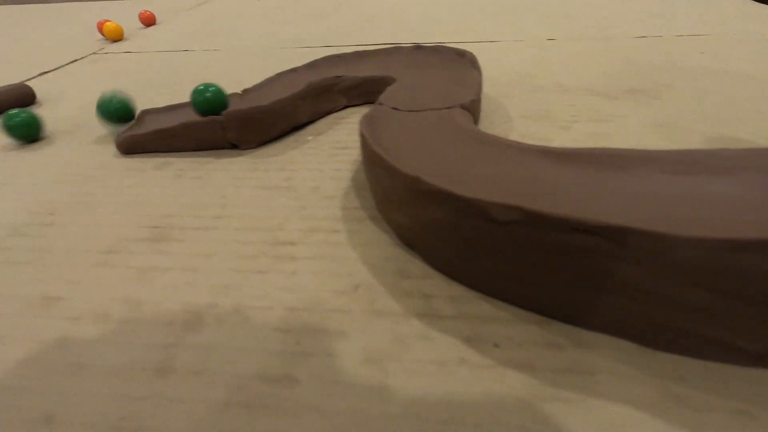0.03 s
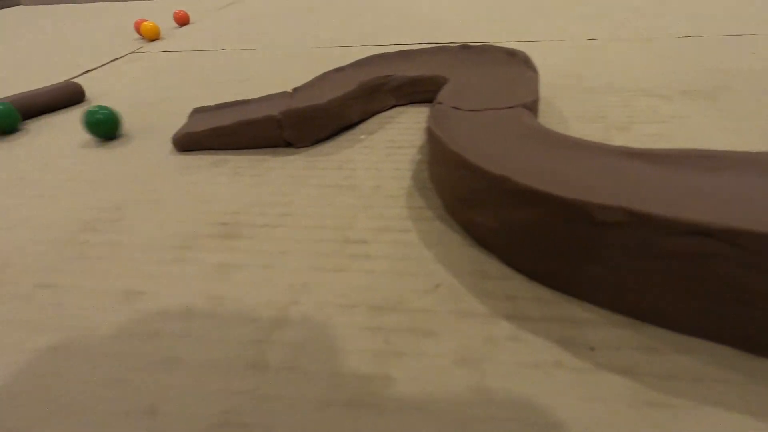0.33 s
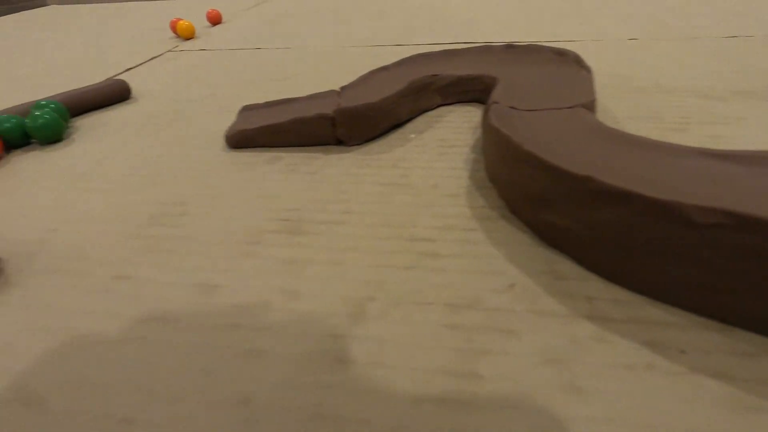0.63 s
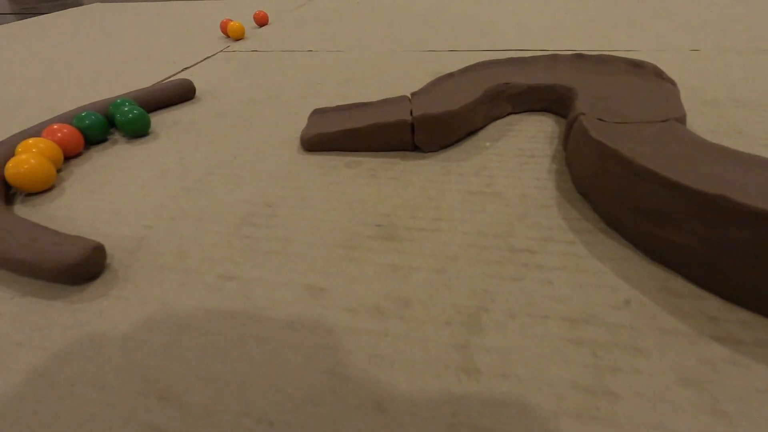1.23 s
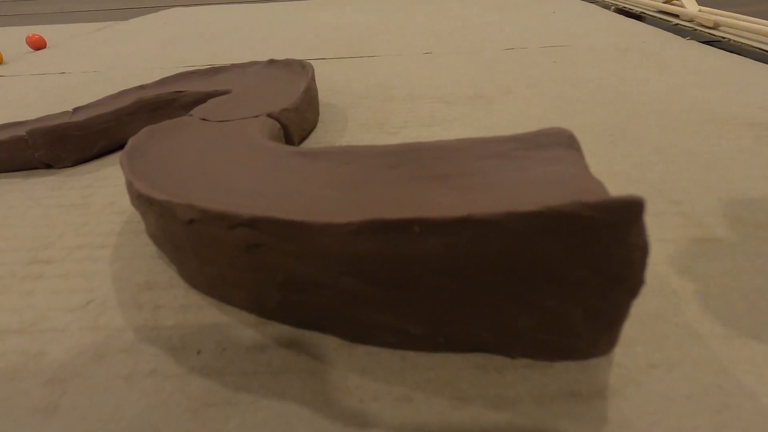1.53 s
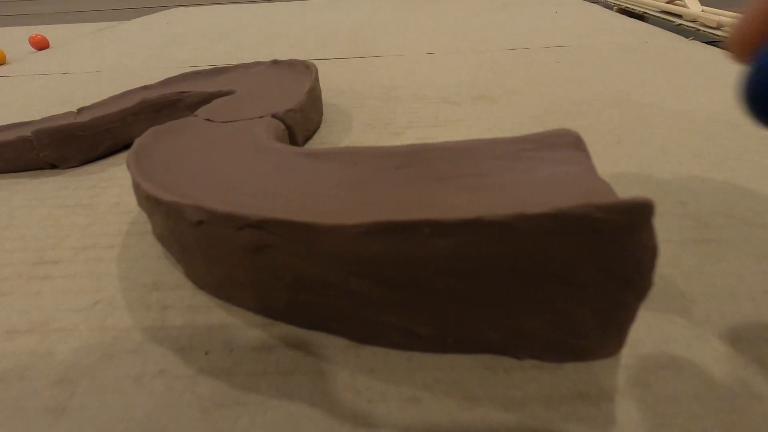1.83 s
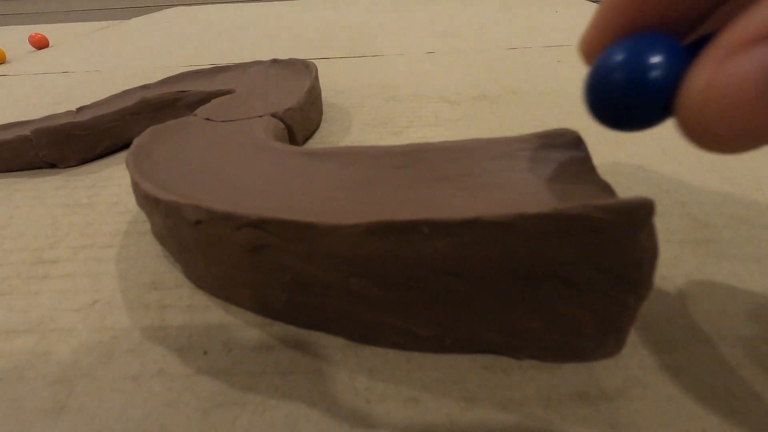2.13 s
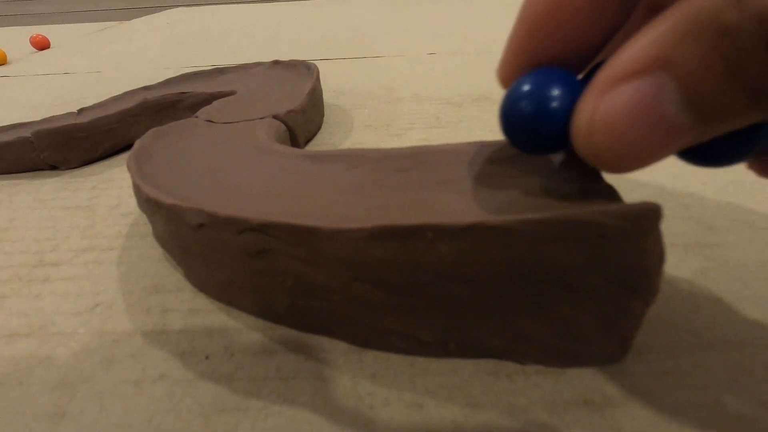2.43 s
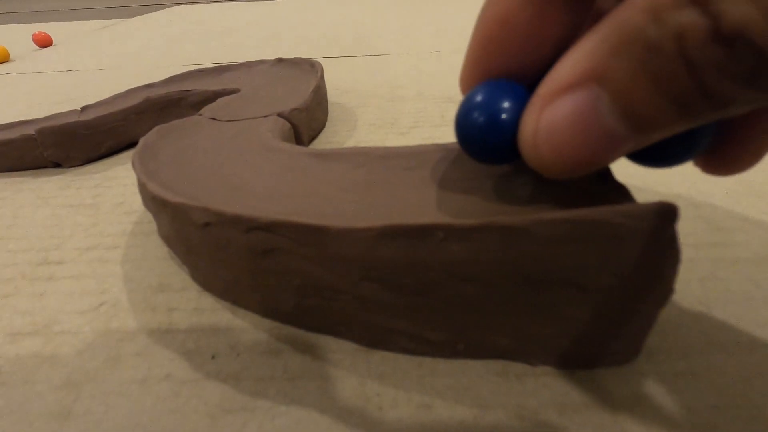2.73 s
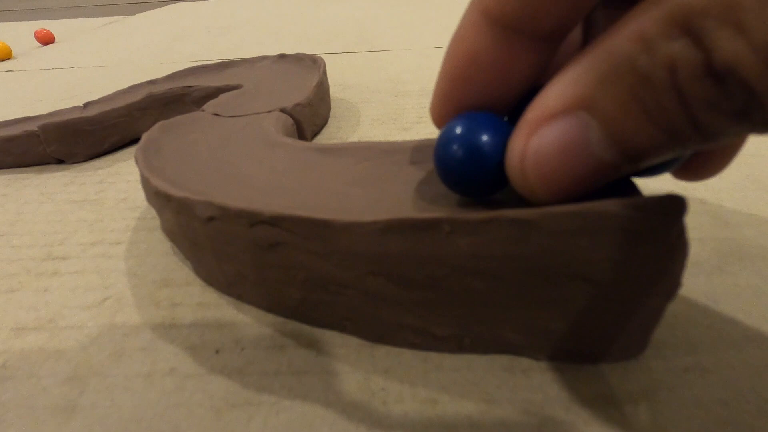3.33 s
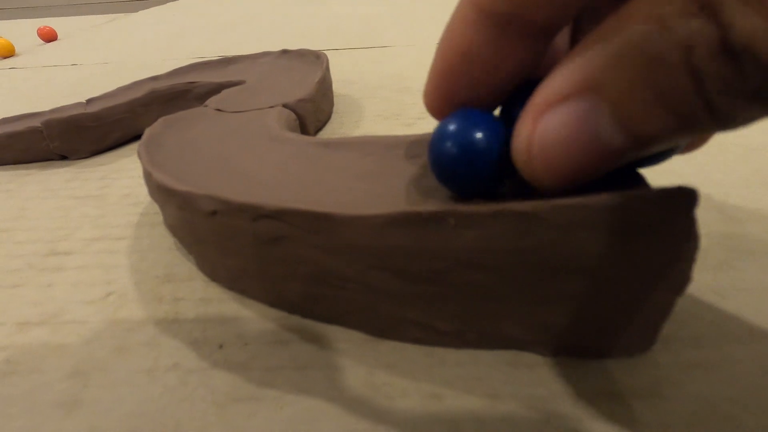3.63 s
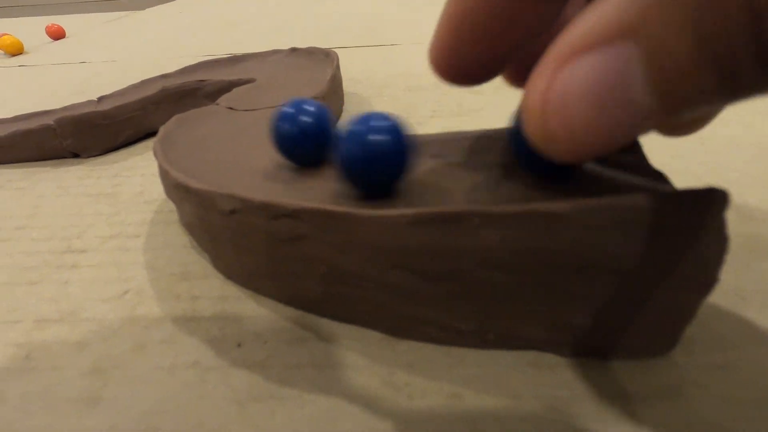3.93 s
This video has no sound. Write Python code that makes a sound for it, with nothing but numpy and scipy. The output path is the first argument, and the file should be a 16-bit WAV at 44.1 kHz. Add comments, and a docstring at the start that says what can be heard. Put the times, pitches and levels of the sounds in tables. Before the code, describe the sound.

Glass marbles knock onto a wooden board, roll with a rumble and click together.

```python
"""Hard knocks on wood, then a rumble: glass marbles drop off a clay track onto a board, roll across it
and click into the marbles waiting there. Each landing bends the board and rings its modes; tiny bumps
under the rolling glass keep it shaking, until the sound cuts off with a dry tick. Then a hand brings
new marbles, which click between the fingers as they are set on the track.
The hand-held camera bumps softly as it moves. The room is small and quiet."""
import sys
import numpy as np
from scipy import signal
from scipy.fft import rfft, irfft, next_fast_len
from scipy.io import wavfile
from scipy.ndimage import uniform_filter1d, map_coordinates

SR = 44100
rng = np.random.default_rng(int(sys.argv[2]) if len(sys.argv) > 2 else 0)


def dump(signal):
    """Clip the signal to [-1, 1] and save it as 16-bit WAV at the path in sys.argv[1]."""
    limited = np.clip(np.atleast_2d(signal).T, -1, 1)
    pcm = np.round(limited * 32767).astype(np.int16)
    wavfile.write(sys.argv[1], SR, pcm)


N = 176400

# How alike left and right are, from centred bass to wide treble: f/Hz, coherence
STEREO_COHERENCE = [(50, 1), (250, 0.76), (600, 0.71), (1500, 0.085), (4000, 0.18), (10000, 0.036)]
BEND_DELAY_S, BEND_HZ = 0.00131, 425.6  # a bending wave's travel time at this frequency


def amp(db):
    """Decibels to gain."""
    return 10 ** (np.asarray(db) / 20)


def unit(x):
    """Scale to rms 1."""
    return x / np.sqrt(np.mean(x ** 2) + 1e-20)


def along(points, hz):
    """Read (f/Hz, value) points on a log frequency axis."""
    freqs, values = np.transpose(points)
    return np.interp(np.log(hz + 1), np.log(freqs + 1), values)


def clock():
    """Time of each sample in seconds."""
    return np.arange(N) / SR


def curves(rows):
    """One automation curve for each column after the time."""
    times, *columns = np.transpose(rows)
    return [np.interp(clock(), times, column) for column in columns]


def during(rows):
    """Gate that shuts fast outside the time span of a table."""
    outside = np.maximum(rows[0][0] - clock(), clock() - rows[-1][0])
    return amp(-3000 * np.maximum(outside, 0))


def swell(peak_s, rise, fall):
    """Bell-shaped envelope."""
    t = clock() - peak_s
    return np.exp(-.5 * (t / np.where(t < 0, rise, fall)) ** 2)


def wobble(per_s):
    """A smooth random curve with per_s knots a second."""
    return map_coordinates(rng.standard_normal(2000), [clock() * per_s], mode="mirror")


def pan(db):
    """Stereo gains, the left db above the right."""
    gains = np.array([amp(np.atleast_1d(db) / 2), amp(-np.atleast_1d(db) / 2)])
    return gains / gains.mean(axis=0)


def filtered(x, response):
    """Equalise x with a gain given as a function of frequency."""
    size = next_fast_len(N + SR // 2)
    return irfft(rfft(x, size) * response(np.fft.rfftfreq(size, 1 / SR)), size)[..., :N]


def mid_side(hz):
    """Mid and side gains that set the stereo width at each frequency."""
    angle = np.arccos(np.clip(along(STEREO_COHERENCE, hz), 0, 1)) / 2
    return np.array([np.cos(angle), np.sin(angle)])


def spread(pair, tone):
    """Colour two unrelated signals and mix them to stereo of rms 1."""
    mid, side = filtered(pair, lambda hz: amp(along(tone, hz)) * mid_side(hz))
    return unit(np.array([mid + side, mid - side]))


def noise(tone):
    """Coloured stereo noise."""
    return spread(rng.standard_normal((2, N)), tone)


def grains(per_s):
    """Two random trains of tiny impulses."""
    return rng.standard_normal((2, N)) * (rng.random((2, N)) < per_s / SR)


def pulse(tone, stretch=1, size=4096):
    """Minimum-phase transient of peak 1 with the given spectrum, transposed by the ratio stretch."""
    hz = np.fft.rfftfreq(size, 1 / SR)
    cepstrum = irfft(np.log(amp(along(tone, hz / stretch))))
    cepstrum[1:size // 2] *= 2
    cepstrum[size // 2 + 1:] = 0
    hit = irfft(np.exp(rfft(cepstrum)))
    return hit / np.abs(hit).max()


def ringing(modes):
    """Sum of decaying sines from rows of f/Hz, level/dB, t60/s."""
    t = np.arange(SR // 3) / SR
    return sum(amp(db - 60 * t / t60) * np.sin(2 * np.pi * hz * t) for hz, db, t60 in modes)


def add(out, s, x):
    """Mix x into out at time s."""
    start = round(s * SR)
    out[:, start:start + x.shape[-1]] += x[..., :N - start]


def in_room(x, wet_db):
    """The small room adds a short diffuse tail whose treble dies first."""
    # Reverb decay: f/Hz, t60/s
    decay = [(200, 0.57), (2000, 0.55), (7000, 0.22), (14000, .2)]
    hz, t, spectra = signal.stft(rng.standard_normal((2, SR // 2)), SR, nperseg=256)
    spectra = spectra * mid_side(hz[:, None]) * amp(-60 * t / along(decay, hz)[:, None])
    mid, side = signal.istft(spectra, SR, nperseg=256)[1]
    tail = np.array([mid + side, mid - side]) / np.linalg.norm(mid + side)
    send = (x + x.mean(axis=0)) / 2
    return x + amp(wet_db) * signal.fftconvolve(send, tail, axes=1)[:, :N]


def room_tone(above_bass_db=-82.5):
    """A steady bed of room noise, its level set by the part above 300 Hz."""
    # Bass-heavy air: f/Hz, relative level/dB
    air_tone = [(15, -36), (30, -4.5), (66, 1.5), (110, -19), (183, -11.5), (433, -37), (848, -38.5),
                (1020, -32), (2010, -34.5), (4040, -42.5), (7300, -40), (8810, -52), (15500, -56)]
    air = noise(air_tone)
    return amp(above_bass_db) * air / filtered(air, lambda hz: hz > 300).std()


def splice_click(at_s=1.3347, peak_db=-46.5):
    """The sound cuts off abruptly with one dull, dry splice click."""
    # Dull click: f/Hz, relative level/dB
    click_tone = [(60, -3), (280, 0), (700, -12), (2000, -24), (7000, -33), (15000, -44)]
    out = np.zeros((2, N))
    add(out, at_s, -amp(peak_db) * pulse(click_tone))
    return out


def camera_bumps(gain_db=6.5):
    """Each nudge of the hand rocks the camera at its low resonance."""
    # Nudges: peak t/s, width/s, relative level/dB
    bumps = [(.005, 0.033, -44), (0.777, 0.061, -47.5), (0.918, 0.029, -47), (1.017, 0.018, -49.5),
             (1.082, 0.02, -48), (1.173, 0.016, -48.5), (1.37, 0.065, -66), (1.551, 0.042, -64.5),
             (2.111, 0.084, -60.5), (2.73, 0.037, -55.5), (2.898, 0.08, -53.5), (3.066, 0.038, -55.5),
             (3.362, 0.011, -51), (3.479, 0.092, -58), (3.797, 0.038, -57.5), (3.973, 0.046, -60.5)]
    # The camera's boom: f/Hz, relative level/dB
    bump_tone = [(25, -31), (42, -6), (51, 4.5), (60, -10.5), (75, -20), (150, -46), (800, -120)]
    nudges = np.sqrt(sum((amp(db) * swell(s, width, width)) ** 2 for s, width, db in bumps))
    boom = noise(bump_tone)
    running_rms = np.sqrt(np.abs(uniform_filter1d(boom[0] ** 2, size=2600)) + 1e-6)
    pan_db = np.interp(clock(), (2.7, 3.2), (.3, 4))
    return amp(gain_db) * nudges * boom / running_rms * pan(pan_db)


def clay_scrapes(q=5.2):
    """Fingers and marbles scrape the clay: bursts of tiny slips through one broad resonance."""
    # Scrapes: peak t/s, width/s, level/dB, resonance f/Hz
    strokes = [(1.96, 0.017, -75.5, 1600), (2.735, .012, -75.5, 1620), (2.783, 0.015, -75.5, 5200),
               (2.825, 0.029, -77, 1770), (3.122, 0.0092, -69, 1010), (3.185, 0.011, -79, 1700),
               (3.272, 0.017, -69, 1530)]
    out = np.zeros((2, N))
    for s, width, db, hz in strokes:
        bandpass = lambda f: (f * hz / (f * hz + 1j * q / 2 * (f * f - hz * hz))) ** 2
        slips = filtered(grains(per_s=1300), bandpass)
        out += amp(db) * swell(s, width, width) * unit(slips + slips.mean(axis=0))
    return out


def fingers(rub_gain_db=-4.5, skin_gain_db=4, rough_db=2.2):
    """Fingers handle marbles and clay: a dull rub, soft touches, rough skin noise and small scrapes."""
    # Friction: t/s, relative rub level/dB, relative skin level/dB
    friction = [(1.34, -61.5, -92), (1.8, -83, -95.5), (2.5, -73, -87.5), (2.75, -65.5, -90.5),
                (3.05, -61, -83), (3.2, -60.5, -76), (3.45, -54, -74.5), (3.7, -62, -82.5), (4.0, -62, -85)]
    # Dull touches on the clay: peak t/s, relative level/dB
    touches = [(2.45, -64), (3.259, -55.5)]
    # Low rub and midrange skin noise: f/Hz, relative level/dB
    rub_tone = [(40, -25), (80, -12.5), (135, -0.5), (180, -9), (310, -19.5), (420, -30.5), (800, -34.5),
                (1800, -79)]
    skin_tone = [(350, -49), (600, -15.5), (849, -15.5), (1070, -7.5), (2120, -9), (2620, -20.5),
                 (6000, -58), (7800, -87)]
    rub_env, skin_env = amp(curves(friction)) * during(friction)
    rub_env = rub_env + sum(amp(db) * swell(s, rise=.009, fall=.016) for s, db in touches)
    rub = amp(rub_gain_db) * rub_env * noise(rub_tone)
    skin = amp(skin_gain_db + rough_db * wobble(per_s=35)) * skin_env * noise(skin_tone)
    return (rub + skin + clay_scrapes()) * pan(db=4)


def brushing():
    """Light brushing comes and goes as soft swells of hiss."""
    # Strokes: peak t/s, rise/s, fall/s, level/dB
    strokes = [(0.067, 0.0082, 0.011, -51.5), (.265, .014, 0.013, -65.5), (0.498, 0.021, 0.022, -64),
               (1.32, 0.041, 0.014, -78.5), (1.94, 0.088, 0.17, -76.5), (2.808, 0.11, 0.08, -81)]
    # Bright hiss: f/Hz, relative level/dB
    brush_tone = [(700, 2.5), (6500, 8.5), (8500, -1), (13000, -10.5), (16000, -27.5)]
    return sum(amp(db) * swell(s, rise, fall) for s, rise, fall, db in strokes) * noise(brush_tone)


def held_marbles(lead_s=0.0092):
    """Marbles click in the hand; a short, bright swell of hiss leads into each small glass click."""
    # Clicks: t/s, click level/dB, hiss level/dB
    clicks = [(3.621, -42.5, -68), (3.873, -43, -55)]
    # Colour of click and hiss, with two bright peaks: f/Hz, relative level/dB
    held_tone = [(500, -22), (2200, -6), (3700, -8), (4450, 8.5), (5400, -3.5), (6800, 7.5), (8200, -1.5),
                 (15000, -54)]
    out = np.zeros((2, N))
    hiss = unit(filtered(grains(per_s=6500), lambda hz: amp(along(held_tone, hz))))
    for s, click_db, hiss_db in clicks:
        add(out, s, amp(click_db) * pulse(held_tone))
        out += amp(hiss_db) * swell(s - lead_s, rise=0.0088, fall=0.012) * hiss
    return in_room(out * pan(db=-4), wet_db=-28)


def glass_clicks(root_hz=6500):
    """Glass meets glass on the board in millisecond clicks."""
    # Clean hits: t/s, level/dB, pitch f/Hz, pan/dB
    clicks = [(0.604, -37, 6550, -6.5), (0.7039, -25, 7300, -23), (0.7672, -39, 5800, -6),
              (0.774, -42, 7200, -9), (1.239, -59.5, 5000, 5)]
    # A brief, bright "tsk" of hiss just before the loudest click, and a faint trail after it:
    # peak t/s, rise/s, fall/s, level/dB, pitch f/Hz, pan/dB
    hiss_swells = [(0.695, 0.011, 0.0087, -42.5, 7500, -9.5), (0.711, .01, 0.098, -74.5, 7900, -4)]
    # A click pitched at root_hz: f/Hz, relative level/dB
    glass_tone = [(500, -31.5), (3500, -17.5), (5400, -5.5), (6700, -2), (7900, -9), (9500, -22),
                  (12000, -39), (16000, -49.5)]
    out = np.zeros((2, N))
    for s, db, hz, pan_db in clicks:
        add(out, s, pan(pan_db) * amp(db) * pulse(glass_tone, hz / root_hz))
    for s, rise, fall, db, hz, pan_db in hiss_swells:
        hiss = unit(filtered(grains(per_s=6200), lambda f: amp(along(glass_tone, f * root_hz / hz))))
        out += pan(pan_db) * amp(db) * swell(s, rise, fall) * hiss
    return in_room(out, wet_db=-14.5)


def board_ring():
    """The wooden board's answer to a tap, with energy 1."""
    # Board modes: f/Hz, relative level/dB, t60/s
    modes = [(157.87, -8, 0.81), (204.7, -2, 0.12), (248, 1.5, 0.082), (309, -3, 0.091),
             (395.6, -1.5, 0.18), (478.5, 1, 0.075), (636, -14.5, 0.39), (769, -12.5, 0.11),
             (1020, -26, 0.14)]
    ring = ringing(modes)
    return ring / np.linalg.norm(ring)


def bent(hit, size=4096):
    """Smear a transient as a bending wave in the board: the highs arrive first."""
    hz = np.fft.rfftfreq(size, 1 / SR)
    lag_cycles = 2 * BEND_DELAY_S * np.sqrt(hz * BEND_HZ)
    wave = irfft(rfft(hit) * np.exp(-2j * np.pi * lag_cycles))[:size // 2]
    return wave / np.abs(wave).max()


def slowing(x, final_hz, settled_s=0.94, octaves_per_s=4.76):
    """Slowing marbles sound duller: a low-pass sweeps down to final_hz at constant power."""
    hz, t, spectra = signal.stft(x, SR, nperseg=1024)
    corner_hz = final_hz * 2 ** (octaves_per_s * np.maximum(settled_s - t, 0))
    gain = 1 / (1 + (hz[:, None] / corner_hz) ** 4)
    power = np.mean(np.abs(spectra) ** 2, axis=(0, 2))
    gain = gain / np.sqrt(power @ gain ** 2 / power.sum())
    return signal.istft(spectra * gain, SR, nperseg=1024)[1][:, :N]


def rolling(bumps_per_s=2500, ring_db=6.5, rumble_gain_db=3.5, grit_gain_db=1, rough_db=1.3):
    """Tiny bumps under the rolling marbles shake the board and hiss at the contact."""
    # The board's rumble: t/s, relative level/dB
    rumble_ride = [(0, -51.5), (.05, -52), (.09, -46), (.2, -50), (.25, -46), (.48, -45.5), (.57, -50),
                   (.67, -49), (.74, -56.5), (.82, -53.5), (.95, -63), (1.18, -66), (1.25, -57),
                   (1.33, -57)]
    # The gritty contact: t/s, relative level/dB, pan/dB
    grit_ride = [(0, -67, 7), (.04, -75, 1.5), (.068, -47.5, -18), (.09, -62, -3), (.145, -48.5, 4),
                 (.2, -55.5, 9.5), (.3, -56.5, 3.5), (.38, -63.5, 8.5), (.42, -59, 2.5), (.485, -55.5, 6.5),
                 (.57, -64, 1.5), (.8, -70.5, 2), (1.2, -80, 4.5), (1.334, -73, 4)]
    # Rumble and grit ahead of the low-pass sweep: f/Hz, relative level/dB
    rumble_tone = [(47, -37.5), (80, -11), (123, -15), (200, -9), (300, -6), (397, -6), (490, -11.5),
                   (580, -14.5), (950, -29), (1800, -30), (3000, -100)]
    grit_tone = [(530, -20.5), (850, -6.5), (1300, -6), (2300, -3), (3300, -6.5), (5580, -25), (8130, -35),
                 (15000, -59.5)]
    rumble_db, = curves(rumble_ride)
    grit_db, pan_db = curves(grit_ride)
    taps = spread(grains(bumps_per_s), [(50, 0), (2000, 0)])  # flat spectrum
    ring = unit(signal.fftconvolve(taps, board_ring()[None], axes=1)[:, :N])
    body = unit(spread(grains(bumps_per_s), rumble_tone) + amp(ring_db) * ring)
    rumble = amp(rumble_db + rumble_gain_db) * during(rumble_ride) * slowing(body, final_hz=284)
    hiss = slowing(spread(grains(per_s=3200), grit_tone), final_hz=2120)
    grit = amp(grit_db + grit_gain_db + rough_db * wobble(per_s=300)) * during(grit_ride) * hiss
    return rumble + grit * pan(pan_db)


def drops(ring_db=-8, snap_db=-8.5, clack_db=-8.5, lowpass_hz=9000):
    """Each landing bends the board, rings its modes and gives a hard crack with a brief ping."""
    # Landings: t/s, thud level/dB, relative crack level/dB, pan/dB, ping f/Hz, ping level/dB
    landings = [(0.0733, -24, -22.5, -5.5, 3070, -27.5), (0.2240, -19.5, -26, 3, 4860, -34),
                (0.2696, -31.5, -48, 3, 5000, -52), (0.4185, -25, -33.5, 0, 4100, -45),
                (0.4387, -32, -44.5, -2, 4970, -49)]
    # The woody thud and the snap that opens the crack: f/Hz, relative level/dB
    thud_tone = [(40, -31.5), (110, -9), (220, 2), (350, 1.5), (500, -4.5), (780, -14), (1200, -22),
                 (2000, -43.5), (5000, -60.5)]
    snap_tone = [(400, -16.5), (1300, -11), (2800, -2), (4500, 0), (7100, -7), (7900, -27.5),
                 (12000, -25.5), (16000, -55)]
    # The crack's short ringing clack, varied on each hit: f/Hz, relative level/dB, t60/s
    clack_modes = [(1025, -2.5, 0.015), (1410, -7, 0.036), (1890, -19, 0.0095), (2550, -5.5, 0.02),
                   (2880, -1, 0.012), (3210, -5.5, 0.015), (3880, -11.5, 0.013), (5240, -8, 0.011),
                   (6530, -12.5, 0.01)]
    out = np.zeros((2, N))
    thud = bent(pulse(thud_tone))
    snap = -pulse(snap_tone)
    ring = -board_ring() * np.linalg.norm(thud)  # same energy as the thud
    for s, thud_db, crack_db, pan_db, ping_hz, ping_db in landings:
        sides = pan(pan_db)
        ping = -ringing([(ping_hz, ping_db, 0.0094)])
        clack = ringing([(hz * rng.normal(1, .012), db + rng.normal(0, 2.5), t60)
                         for hz, db, t60 in clack_modes])
        clack = np.abs(clack).max() * bent(clack[:len(snap)])
        add(out, s, sides * amp(thud_db) * thud)
        add(out, s + BEND_DELAY_S, sides * amp(thud_db + ring_db) * ring)
        add(out, s, sides * amp(crack_db + snap_db) * snap)
        add(out, s, sides * amp(crack_db + clack_db) * clack)
        add(out, s, sides * ping)
    softened = filtered(out, lambda hz: 1 / np.sqrt(1 + (hz / lowpass_hz) ** 4))
    return in_room(softened, wet_db=-13.5)


def scene():
    """The marbles in front; handling noises, the splice click and room tone behind them."""
    marbles = drops() + rolling() + glass_clicks() + held_marbles()
    return marbles + camera_bumps() + fingers() + brushing() + splice_click() + room_tone()


def record(dry):
    """The camera keeps nothing above its band limit."""
    return filtered(dry, lambda hz: hz < 15600)


dry = scene()
out = record(dry)
dump(out)
```